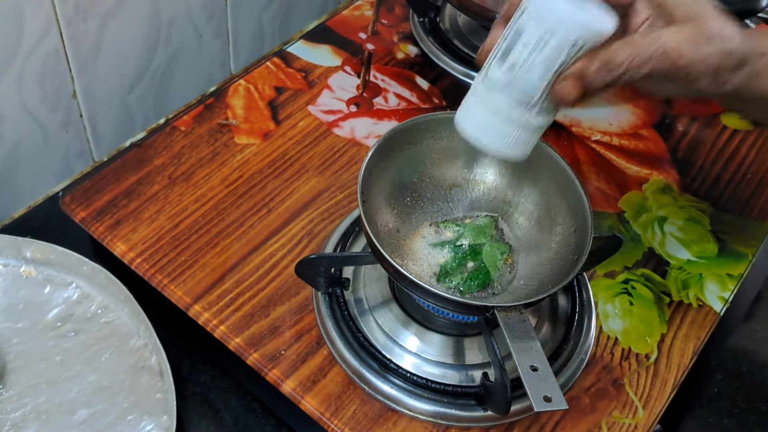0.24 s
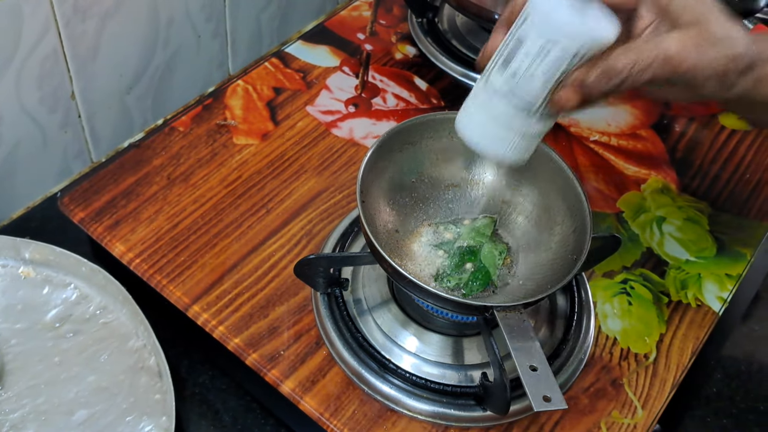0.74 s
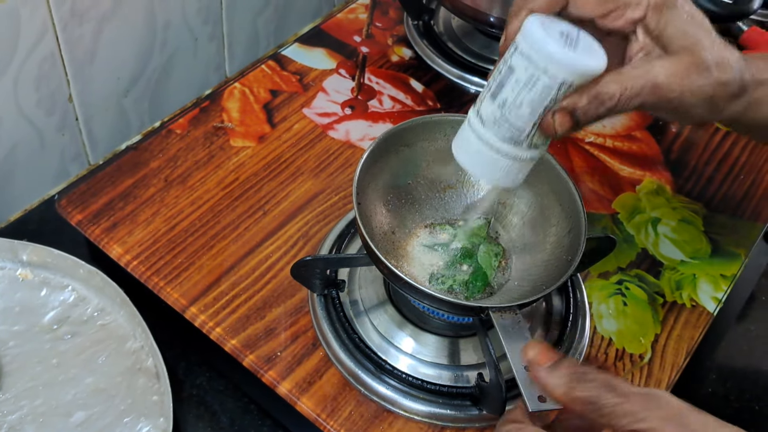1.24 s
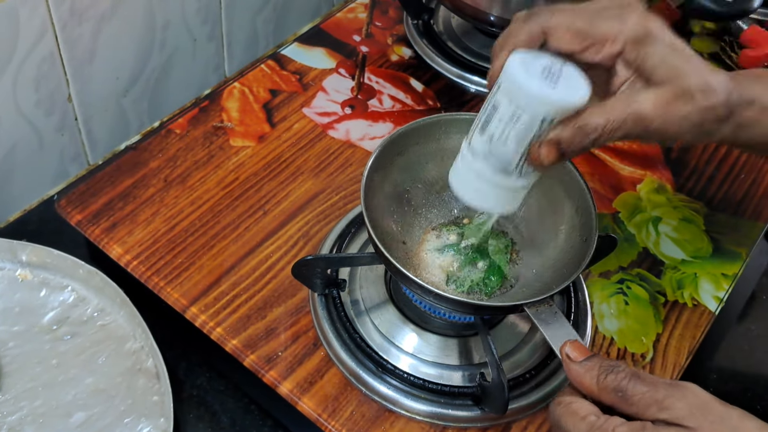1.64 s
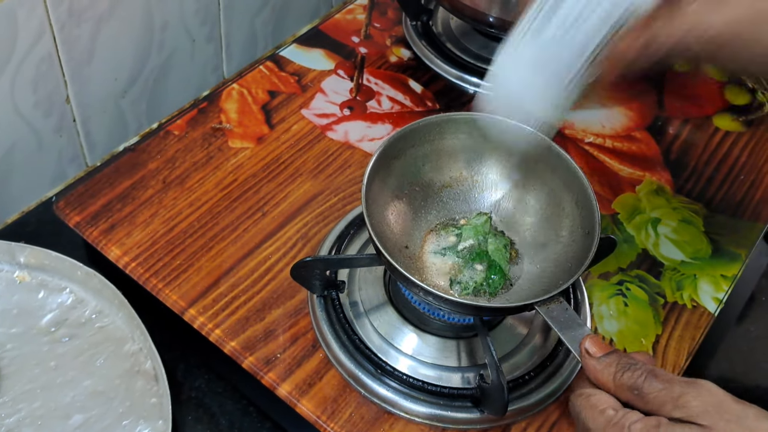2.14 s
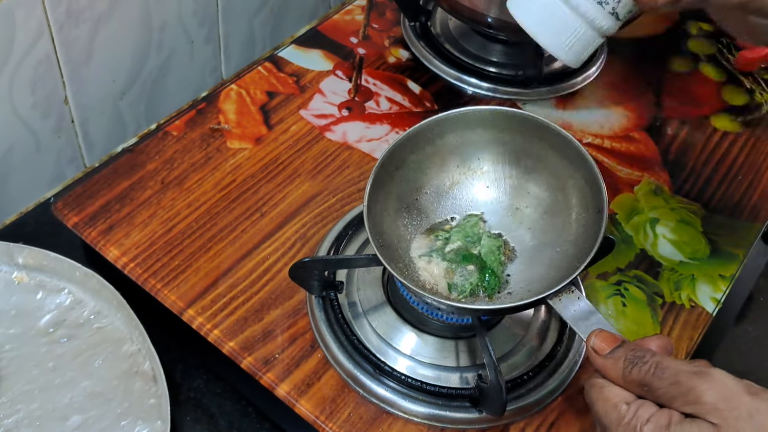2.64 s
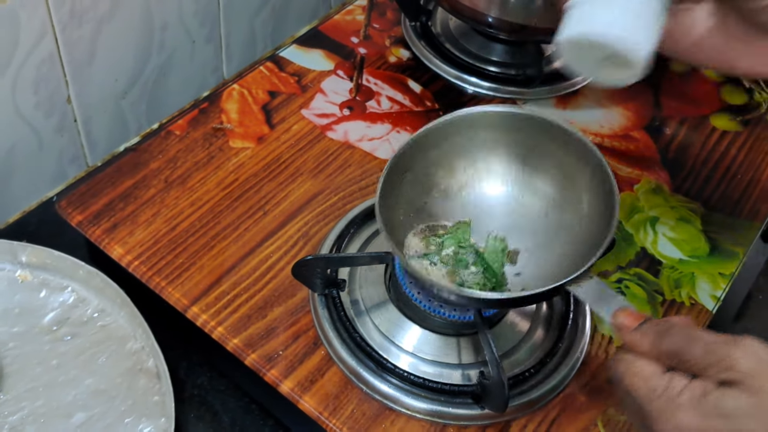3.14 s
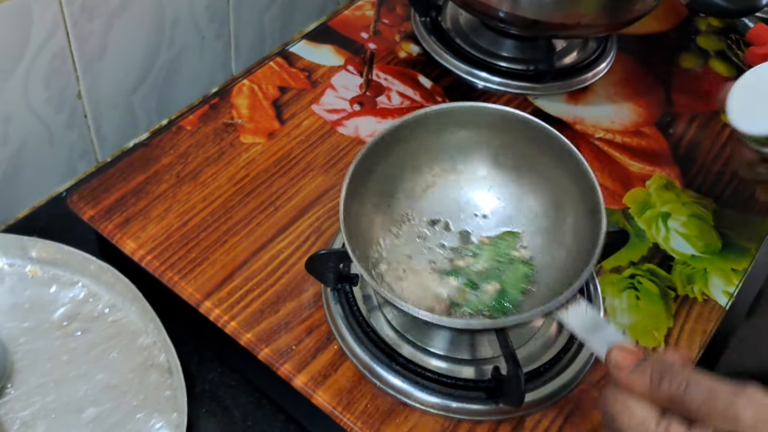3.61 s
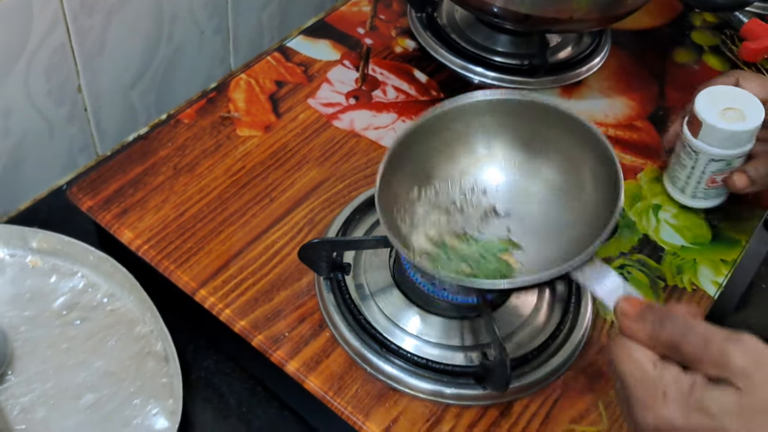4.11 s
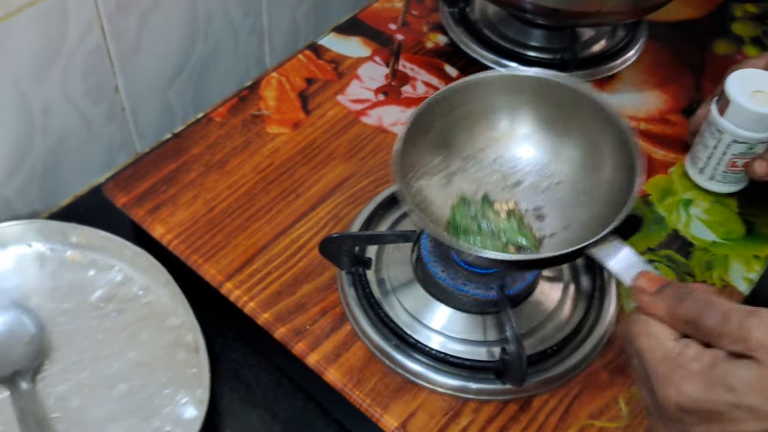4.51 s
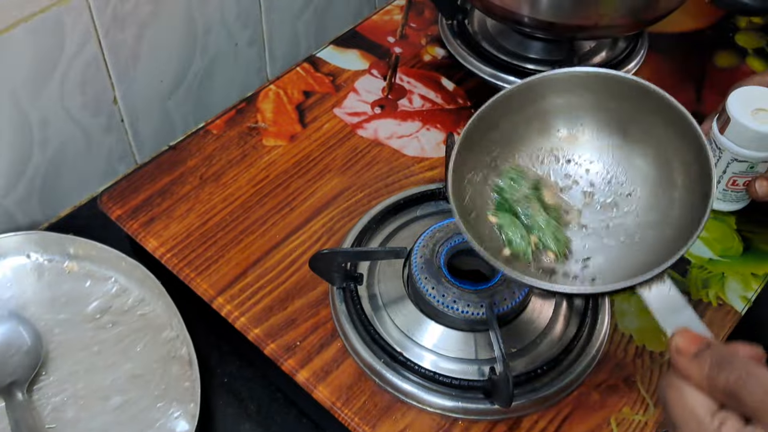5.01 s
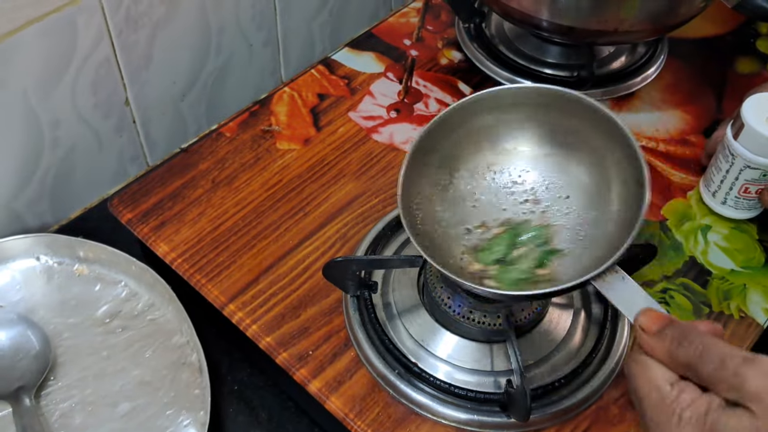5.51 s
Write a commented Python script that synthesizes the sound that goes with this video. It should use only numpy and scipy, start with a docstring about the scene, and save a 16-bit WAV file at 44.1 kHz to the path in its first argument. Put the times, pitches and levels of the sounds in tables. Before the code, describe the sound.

Close up in a small tiled kitchen, hot oil hisses, crackles and spits around frying leaves. The steel pan is nudged repeatedly on its metal support, making brief ringing scrapes. More sharp pops and tiny steam squeaks follow before the pan is set down with a clank near the end. Underneath, a soft gas flame and an engine beyond the wall hum low and slowly grow.

```python
"""Hot oil fizzes, spits and squeaks round seeds and leaves in a small steel pan on a gas stove.
Water drops burst and ring their cavities, fine bubbles click, and steam whistles out of the leaves.
From 1.4 s the pan scrapes on its support by stick-slip friction; it is lifted, swirled and set down.
A slow engine, perhaps a motorcycle in the street, drones through the wall, and the flame rumbles softly.
The tiled kitchen adds a short reverberation to the frying and the scraping."""
import sys
import numpy as np
from scipy import signal
from scipy.fft import rfft, irfft, next_fast_len
from scipy.io import wavfile
from scipy.ndimage import uniform_filter1d, map_coordinates

SR = 44100
rng = np.random.default_rng(int(sys.argv[2]) if len(sys.argv) > 2 else 0)


def inscribe(sig):
    """Save sig as 16-bit PCM at rate SR to the path in sys.argv[1].

    A 1-D sig is mono; a 2-D sig holds one channel per row.
    Samples are clipped to [-1, 1] before scaling.
    """
    pcm = np.round(np.clip(np.atleast_2d(sig).T, -1, 1) * 32767)
    wavfile.write(sys.argv[1], SR, pcm.astype(np.int16))


N = 254104
T = np.arange(N) / SR
LEFT_RIGHT = np.array([[1], [-1]])  # opposite signs in the two channels

# Loudest bursting drops: t/s, level/dB, cavity f/Hz, ring over crack/dB, left over right/dB
DROPS = [(0.047, -37.5, 4940, 19, 6), (0.1712, -28.5, 7540, -9, -2), (0.1715, -31, 2200, 2, 4),
         (0.2374, -32.5, 2410, 2, 3), (0.2608, -20, 4700, -7.5, -1), (0.3182, -24.5, 2780, 3, 1.5),
         (0.3184, -27, 5100, 5, -1), (0.319, -35, 13500, 0, 0), (0.3364, -29, 14000, 11, 4),
         (0.352, -41, 1980, 4, 4), (0.477, -39, 12700, 2, -2), (0.5207, -38.5, 5040, 6, 1),
         (0.6588, -43, 6000, 10, 0), (0.6964, -15.5, 8340, -26, 0.5), (0.9723, -22.5, 13290, -6.5, 1),
         (1.213, -37.5, 2612, 6, 3), (1.2135, -43, 5000, 0, 3), (1.4485, -27, 12600, -2.5, 2),
         (1.5124, -32, 4100, -1.5, -3.5), (1.657, -39, 4200, -20, 1), (1.7, -28.5, 1480, -6.5, 1),
         (1.722, -39, 7400, 0, -3), (1.854, -44, 1730, -3, 1), (1.914, -42, 3000, -23, -3),
         (1.9489, -38.5, 1820, -10, 1), (2.0576, -42, 2580, 0, 0), (2.142, -41.5, 12200, -4, 5),
         (2.4721, -38.5, 6500, 15, 0), (2.56, -43, 3440, 7, 2), (2.693, -37, 2430, -7, 2),
         (2.766, -41.5, 4480, 2, 3), (2.803, -39.5, 10000, 4, -2), (2.8174, -31.5, 13290, -2, 0),
         (2.874, -36, 4000, 3, 0), (2.965, -39.5, 6000, -14, 0), (3.1633, -38.5, 4030, -10, 3),
         (3.3259, -42, 2730, -1, 5), (3.337, -40, 1470, 2, -2), (3.6333, -30.5, 12420, 5, -1),
         (3.6659, -31, 10160, -4, 0), (3.716, -39, 12800, 11, 0), (3.7325, -17, 12900, -8, 0),
         (4.077, -34.5, 12500, 17, -6), (4.1013, -36, 8300, -1, 1), (4.2036, -40.5, 4970, -12, -1),
         (4.343, -41.5, 1430, 12, 0), (4.3654, -29.5, 13400, 3, -10), (4.399, -35, 2030, -11, 1.5),
         (4.4791, -28.5, 3850, -5, 1), (4.4982, -37, 4030, 1, 4), (4.9796, -34.5, 4300, -7, 0),
         (5.348, -30, 8900, 24, -3), (5.3956, -24.5, 7300, 4, -0.5), (5.395, -35, 1600, 13, -4),
         (5.474, -26, 1500, 2, 1), (5.5378, -20, 9970, -8, 1.5), (5.581, -24.5, 2980, -20, 0.5)]
# Delay of the left channel as swirling carries the pan to the right: t/s, lag/ms
LEFT_LAG = [(0, 0.01), (3.6, 0), (4.3, 0.075), (5.76, 0.033)]
# Response of the bowl and the direct path to a crack: f/Hz, level/dB
CRACK_COLOUR = [(100, -18), (500, -10), (1100, 6.5), (2700, 4.5), (3700, 0), (4700, 2), (6500, -1),
                (8200, 3), (14000, -0.5), (16500, -4), (18000, -40)]
# Further colouring of the cracks that the bowl radiates into the room: f/Hz, level/dB
BOWL_RADIATION = [(300, 7), (800, 1.5), (1200, 3), (2000, -1), (3500, 1.5), (4500, 2.5), (6800, -2.5),
                  (8200, 1.5), (10000, -3.5), (12600, 2.5), (15500, -4.5)]
def pops(ring_q=6.0, side_db=-4.0, thud_db=-12.0, mirror_db=-8.5):
    """Impulse excitation: a water drop bursts with a crack and rings its cavity; large drops thud."""
    out = np.zeros((2, N))
    hz = np.fft.rfftfreq(2048, 1 / SR) + 1
    octaves = np.log2(np.clip(hz, 1000, 13000) / 1000)
    direct_path = gain_at(hz, CRACK_COLOUR)
    thud_shape = gain_at(hz, [(25, -20), (55, 4.5), (300, -4.5), (1000, -14.0), (3000, -21.5)])
    largest_db = max(row[1] for row in DROPS)
    tail_room = ((0, 0), (0, SR // 3))
    for s, db, ring_hz, ring_db, left_db in DROPS + spits():
        size_db = db - largest_db
        mid, side = crack(), crack()
        lag_s = np.interp(s, *np.transpose(LEFT_LAG)) / 1000
        left_delay = np.exp(-2j * np.pi * hz * lag_s * np.array([[1], [0]]))
        stereo = (mid + undb(side_db) * side * LEFT_RIGHT) * left_delay
        # smaller cavities crack brighter, fainter drops duller
        db_per_octave = 1.66 * np.log2(ring_hz / 3000) + 0.04 * size_db
        tilted = stereo * direct_path * undb(db_per_octave * octaves)
        mirror_s = rng.uniform(0.000505, 0.00099)  # reflection from the far side of the bowl
        comb = 1 + undb(mirror_db) * np.exp(-2j * np.pi * hz * mirror_s)
        snap = burst(irfft(tilted * comb), 0.82)
        resonance = 1 / (1 + 1j * ring_q * (hz / ring_hz - ring_hz / hz))
        ring = undb(ring_db) * burst(irfft(stereo * resonance), 1.0)
        thud = undb(thud_db + size_db) * burst(irfft(mid * thud_shape), 0.34)
        direct = burst(snap + ring + thud, 0.01)
        room_snap = burst(irfft(tilted * gain_at(hz, BOWL_RADIATION)), 0.61)
        radiated = burst(room_snap + undb(-4) * ring + thud, 0.01)
        # small drops and ringing cavities lie deep in the bowl and excite the room less
        wet_db = 0.72 + 0.084 * size_db - 0.35 * np.clip(ring_db + 11, 0, 15)
        heard = np.pad(direct, tail_room) + undb(wet_db) * reverberation(np.pad(radiated, tail_room))
        start_s = max(s - direct.shape[1] / 2 / SR, 0)
        add(out, start_s, heard * undb(db + left_db * LEFT_RIGHT / 2))
    return out


def crack(snap_s=0.00041, bowl_s=0.0015, bowl_db=-11.5):
    """A short transient is broadband: the flattened spectrum of a snap and its rattle round the bowl."""
    t = T[:2048]
    snap, rattle = rng.standard_normal((2, len(t)))
    pressure = snap * np.exp(-t / snap_s) + undb(bowl_db) * rattle * np.exp(-t / bowl_s)
    spectrum = rfft(np.roll(pressure, len(t) // 2))
    return spectrum / np.sqrt(uniform_filter1d(np.abs(spectrum) ** 2, size=24))


def spits(per_second=3, first_db=-47.5, drying_db_per_s=0.5, low_hz=2260, high_hz=10100):
    """Evaporation: faint drops burst at random and weaken as the leaves dry; rows as in DROPS."""
    when, pitch, *chance = rng.random((int(per_second * T[-1]), 5)).T
    loudness, ring, place = 2 * np.array(chance) - 1
    s = when * T[-1]
    db = first_db - drying_db_per_s * s + 2 * loudness
    ring_hz = low_hz * (high_hz / low_hz) ** pitch
    ring_db = 4 + 10 * np.abs(ring)
    return list(zip(s, db, ring_hz, ring_db, 2 * place))


# Frying, livelier once the oil is swirled over hot steel: t/s, fizz level/dB, crackle level/dB
FRYING = [(0, -44, -45.5), (.55, -47, -51.5), (1.2, -46.5, -52), (1.9, -48.5, -55), (2.15, -47.5, -53.5),
          (2.28, -49.5, -55), (2.38, -46.5, -58.5), (2.95, -47.5, -49), (3.35, -45.5, -53),
          (3.9, -45, -52.5), (4.25, -42.5, -52.5), (4.9, -44, -55.5), (5.25, -49, -57), (5.76, -46.5, -55)]
# Spectrum of the fine bubbles: f/Hz, level/dB
FIZZ = [(2000, -39), (5000, -1.1), (7300, -3), (8200, 7), (9300, 1), (10500, 7), (12700, 12.5), (14000, 8),
        (16000, 7)]
# Spectrum of the larger bubbles: f/Hz, level/dB
CRACKLE = [(600, -32), (1300, 2), (2700, 7.5), (3400, -0.5), (4500, 9.5), (6500, -4), (9000, 7.5)]
def sizzle(right_db=1, ticks_db=-17):
    """Bubble pitch falls with size: fine bubbles fizz and tick, larger ones crackle lower down."""
    fizz_db, crackle_db = curves(FRYING)
    fizz = sum(kitchen(bubbles(per_second=500, spread_db=8), wet_db=14) for _ in range(5))
    ticks = kitchen(bubbles(per_second=96, spread_db=6), wet_db=-18)
    crackle = 0
    for hz in np.geomspace(1100, 9000, num=8):
        clicks = bubbles(per_second=140, spread_db=4)
        crackle += gain_at(hz, CRACKLE) * band(clicks, hz / 1.22, hz * 1.215)
    fizz = colour(unit(fizz) + undb(ticks_db) * unit(ticks), FIZZ)
    fizz = unit(fizz) * undb(fizz_db + walk(19))
    crackle = unit(kitchen(crackle, wet_db=2.5)) * undb(crackle_db + 1.5 * walk(18))
    return (fizz + crackle) * undb(-right_db * LEFT_RIGHT / 2)


def bubbles(per_second, spread_db):
    """Shot noise: independent bubbles click at random instants, most faint and a few strong."""
    out = np.zeros(N)
    at = np.flatnonzero(rng.random(N) < per_second / SR)
    size = rng.exponential(size=N)[at]
    sign = np.sign(rng.random(N)[at] - .5)
    out[at] = sign * undb(spread_db * np.minimum(size, 5))
    return unit(out)


# Steam escaping from a leaf: t/s, relative level/dB, f/Hz, duration/s, bandwidth/Hz
STEAM_JETS = [(3.255, -42.5, 10800, 0.0063, 3500), (3.832, -52, 12800, .018, 200),
              (3.912, -41, 6990, .0044, 3000), (4.17, -32.5, 12700, 0.0075, 330),
              (4.766, -38, 12800, .009, 420), (5.129, -38, 13600, .006, 900), (5.13, -38, 12210, .006, 550),
              (5.446, -42, 12600, .0068, 800)]
def squeaks(gain_db=1.0):
    """Jet noise: steam forced through a tiny hole whistles in a narrow band; a wider tear hisses."""
    out, t = np.zeros(N), T[:4096]
    for s, db, hz, length_s, width_hz in STEAM_JETS:
        tone = band(rng.standard_normal(len(t)), hz - width_hz / 2, hz + width_hz / 2)
        envelope = t * np.exp(-(t / length_s) ** 2)
        add(out, s, undb(db + gain_db) * burst(tone * envelope, length_s))
    return kitchen(out, wet_db=0.5)


# Shoves of the pan: t/s, level/dB, swell time/s, tilt/(dB per octave), pan note over stove modes/dB
SHOVES = [(1.430, -29, 0.018, -0.5, 6), (1.499, -33.5, 0.015, -3.5, 13), (1.645, -29.5, 0.015, 3, 7.5),
          (1.722, -22.5, 0.0095, 0.5, 13), (2.186, -26.5, .012, 0, 1), (2.289, -45, 0.031, 1, 6),
          (2.354, -30, .016, 3.5, 4.5), (2.43, -36.5, 0.028, -1.5, 6), (2.561, -35, 0.0091, -2, 2),
          (2.615, -38.5, 0.0084, -6, -8), (2.661, -42, 0.01, 2, -1), (2.735, -25, 0.0085, 0.5, 11),
          (2.795, -27, 0.0072, -6, -2), (2.848, -37, 0.008, -8, 2), (2.923, -28.5, 0.011, -1.5, -5),
          (3.003, -35, 0.027, -4.5, -8), (3.090, -29.5, 0.016, -1.5, 2), (3.149, -36.5, .009, 2, -8),
          (3.195, -29.5, 0.013, 1, 2), (3.243, -37, 0.011, -2.5, 8), (3.31, -41.5, 0.012, -6, -3),
          (5.355, -38, 0.016, 1, 13), (5.421, -37.5, 0.032, -1, 4)]
# Spectrum of steel rasping on the support: f/Hz, level/dB
RASP = [(50, -45), (200, -24), (290, 15), (430, 16), (520, 11), (650, 17), (760, 15), (880, 16.5),
        (1150, 6.5), (1480, 10), (1800, 1), (2200, 1), (3500, -10.5), (7000, -26), (15000, -30)]
# The pan landing on its support: t/s, level/dB, swell time/s
SET_DOWN = (5.587, -24, 0.0094)
# Spectrum of that impact: f/Hz, level/dB
CLANK = [(50, -37), (220, -24), (330, 6), (430, 5), (540, -5), (720, -1), (900, 2), (1100, -3), (1500, -12),
         (1850, -13.5), (2600, -8.5), (4500, -27), (8000, -42), (15000, -27)]
PIVOT_HZ = 500  # a shove's spectrum tilts about this frequency
def pan_scrapes(left_db=2.0):
    """Friction and impact: the shoved pan rasps and rings the stove, then lands with a clank."""
    rings, rasps = np.zeros(N), np.zeros(N)
    for s, db, swell_s, tilt, note_db in SHOVES:
        force = stick_slip(swell_s)
        rasp = colour(force, [(hz, level + tilt * np.log2(hz / PIVOT_HZ)) for hz, level in RASP])
        rasp_db = -7 + 2 * np.log2(swell_s / 0.02)  # a slow shove rasps more than a quick one
        add(rings, s, undb(db) * burst(stove_ring(force, tilt, note_db), 0.013))
        add(rasps, s, undb(db + rasp_db) * burst(rasp, 0.016))
    s, db, swell_s = SET_DOWN
    clank = colour(stick_slip(swell_s), CLANK)
    add(rasps, s, undb(db) * burst(clank, 0.015))
    heard = kitchen(band(rings, 266, 6100), wet_db=-12) + kitchen(rasps, wet_db=-2)
    return heard * undb(left_db * LEFT_RIGHT / 2)


def stick_slip(swell_s, grit=1.2):
    """Stick-slip friction: uneven slips of steel on steel give a force that swells and dies away."""
    t = T[:SR // 2]
    noise = rng.standard_normal(len(t))
    return np.sign(noise) * np.abs(noise) ** grit * t * np.exp(-t / swell_s)


# Modes of the support and stove top together: f/Hz, level/dB, T60/s
STOVE_MODES = [(282.7, 2.5, 0.46), (345.4, 4, 0.2), (369.3, 0, 0.26), (419.6, 0, 0.17), (431.3, 2.5, 0.24),
               (473, -15, 0.34), (579, -5.5, 0.46), (630, -3, 0.41), (723, -4.5, 0.091), (826, -13, 0.11),
               (909, -10.5, 0.14), (1077, -23, .2), (1475, -16, 0.1), (2110, -20, 0.13)]
def stove_ring(force, tilt, note_db, detune_spread=.004, scatter_db=2, bend=0.0034):
    """Modal superposition: a moving contact bends and reweights stove modes; the pan's note holds."""
    def mode(hz, t60_s):
        pole = np.exp((2j * np.pi * hz - np.log(1000) / t60_s) / SR)
        return burst(signal.lfilter([1], [1, -pole], force).imag, 1)
    ring = 0
    for hz, db, t60_s in STOVE_MODES:
        detune, weight = rng.standard_normal(2)
        gain = undb(db + tilt * np.log2(hz / PIVOT_HZ) + scatter_db * weight)
        ring += gain * mode(hz * (1 + detune_spread * detune), t60_s)
    pitch_ratio = 1 + bend * walk(42)[:len(ring)]
    bent = map_coordinates(ring, [np.cumsum(pitch_ratio)], order=1)
    return bent + undb(note_db) * mode(hz=662.6, t60_s=0.23)


# Soft bump of the swirled pan: t/s, level/dB, f/Hz, swell time/s
BUMP = (4.185, -41, 262, .013)
def pan_bump():
    """Damped oscillation: one low note swells and dies as the pan is swung."""
    s, db, hz, swell_s = BUMP
    out, t = np.zeros(N), T[:SR // 4]
    note = np.sin(2 * np.pi * hz * t) * t * np.exp(-t / swell_s)
    add(out, s, undb(db) * burst(note, 0.026))
    return out


# Firing rate of the engine: t/s, f/Hz
FIRING_RATE = [(0, 28.95), (.6, 28.49), (1.35, 28.1), (1.65, 32.22), (1.97, 33.93), (2.55, 24.55),
               (3.3, 23.55), (4.0, 25.1), (4.65, 26.08), (4.9, 27.66), (5.4, 27.4), (5.76, 29)]
# Engine load, heard as the strength of the drone: t/s, relative level/dB
ENGINE_LOAD = [(0, -50), (.65, -41.5), (1.05, -48.5), (1.28, -45), (1.6, -56), (1.72, -45), (1.95, -49),
               (2.25, -41.5), (2.45, -49), (2.72, -59), (2.92, -44), (3.05, -48), (3.34, -41),
               (3.85, -40.5), (4.25, -39), (4.38, -47), (4.62, -38), (5.0, -35.5), (5.47, -38),
               (5.56, -49.5), (5.72, -33)]
# Transmission of the drone through the wall: f/Hz, level/dB
WALL_DRONE = [(70, -57), (88, -3.5), (100, 3.5), (122, 1), (143, 10), (154, -3.5), (167, 2), (190, -5.5),
              (222, -8), (260, -34)]
# Strength of the deep thud: t/s, relative level/dB
THUD_LEVEL = [(0, -77), (1.1, -58), (2.0, -58.5), (3.9, -54), (4.3, -44.5), (5.0, -41.5), (5.48, -43),
              (5.58, -56), (5.76, -51)]
# Transmission of the thud through the wall: f/Hz, level/dB
WALL_THUD = [(46, -38), (54, 1), (59, 0.5), (68, 11.5), (71, 5), (76, -2.5), (84, -20), (110, -30)]
# One boom of the slowing engine: t/s, level over the thud/dB, half duration/s
BOOM = (2.56, 21.3, 0.072)
def engine(drone_db=-3.5, waver_db=1.66, swell_db=1.5, idle_db=-43):
    """Wall transmission: only low harmonics of the firing rate pass, as a wavering drone and a thud."""
    hz, = curves(FIRING_RATE)
    load_db, = curves(ENGINE_LOAD)
    thud_db, = curves(THUD_LEVEL)
    boom_s, boom_db, half_length_s = BOOM
    thud_db += boom_db * np.exp(-((T - boom_s) / half_length_s) ** 2)
    phase = 2 * np.pi * np.cumsum(hz * (1 + 0.0037 * walk(14))) / SR
    orders = np.arange(2, 10)[:, None]
    harmonics = np.array([np.sin(k * phase + 2 * np.pi * rng.random()) for k in orders])
    flutter = undb([waver_db * walk(15) + swell_db * walk(5) for _ in orders])
    db_per_octave = 0.14 * (load_db - idle_db)  # load strengthens the upper harmonics
    drone = gain_at(orders * hz, WALL_DRONE) * undb(db_per_octave * np.log2(orders))
    drone /= np.sqrt(np.sum(drone ** 2, axis=0) / 2)  # equal power at any firing rate
    drone = flutter * drone * undb(load_db + drone_db)
    thud = gain_at(orders * hz, WALL_THUD) * undb(thud_db)
    return np.sum(harmonics * (drone + thud), axis=0)


# Spectrum of the flame's rumble: f/Hz, level/dB
RUMBLE = [(25, -47), (38, -9), (52, 0.5), (80, -1), (115, -1), (146, 8), (180, -9.5), (250, -0.5),
          (370, -4), (470, -8), (680, -12), (900, -14.5), (2000, -22.5), (5000, -30)]
# The flame, rushing freely once the pan is lifted: t/s, level/dB, relative level of the rush/dB
FLAME_LEVEL = [(0, -52, -6), (1.2, -54, -3), (3, -47.5, -4), (4.1, -48.5, 3.5), (5.76, -42.5, 2.5)]
# Resonances of the bowl in the gas flow: f/Hz, bandwidth/Hz, level/dB
BOWL_MODES = [(588, 200, -2), (1160, 136, -4.5), (1480, 125, -8.5), (2790, 340, -12.5)]
def flame(flutter_db=1.0, bowl_db=-11):
    """Combustion noise: the flame rumbles and flutters, and rushing gas excites the bowl's modes."""
    db, rush_db = curves(FLAME_LEVEL)
    mid, side = (unit(colour(rng.standard_normal(N), RUMBLE)) for _ in range(2))
    side = colour(side, [(60, -4.0), (150, -7.5), (400, -8.0), (1000, 1.5)])  # narrower in the bass
    rush = 0
    for hz, width_hz, mode_db in BOWL_MODES:
        flow = rng.standard_normal((2, N))
        rush += undb(mode_db) * unit(band(flow, hz - width_hz / 2, hz + width_hz / 2))
    heard = mid + side * LEFT_RIGHT + unit(rush) * undb(bowl_db + rush_db)
    return heard * undb(db + flutter_db * walk(7.5))


def reverberation(x, t60_s=0.35, treble_t60_s=0.3):
    """Diffuse field: each spot has its own echo off the tiles, alike left and right only in the bass."""
    t = T[:SR // 3]
    mid, side = rng.standard_normal((2, len(t)))
    noise = mid + band(side, 390, 24000) * LEFT_RIGHT
    low = signal.sosfilt(signal.butter(1, 4000, fs=SR, output="sos"), noise)
    tail = low * undb(-60 * t / t60_s) + (noise - low) * undb(-60 * t / treble_t60_s)
    tail *= 1 - np.exp(-t / 0.0021)
    tail /= np.sqrt(np.sum(tail ** 2) / 2)
    tail[:, int(.0118 * SR)] += .2  # early reflection from the nearest wall
    return signal.oaconvolve(np.atleast_2d(x), tail, axes=1)[:, :x.shape[-1]]


def kitchen(x, wet_db):
    """Room sound is the sum of the direct and reverberant fields."""
    return x + undb(wet_db) * reverberation(x)


def undb(db):
    """Amplitude ratio of a level in decibels."""
    return 10 ** (np.asarray(db) / 20)


def unit(x):
    """Power normalisation to rms 1."""
    return x / np.sqrt(np.mean(x ** 2))


def burst(x, seconds):
    """Energy normalisation to that of rms 1 held for the given time."""
    return x * np.sqrt(seconds * SR / np.sum(x ** 2))


def curves(table):
    """Linear interpolation of each column of a time table, sample by sample."""
    s, *columns = np.transpose(table)
    return [np.interp(T, s, column) for column in columns]


def gain_at(hz, points):
    """Frequency response interpolated from rows of f/Hz, level/dB."""
    f, db = np.transpose(points)
    return undb(np.interp(np.log(hz + 1), np.log(f), db))


def colour(x, points):
    """Zero-phase filtering by rows of f/Hz, level/dB."""
    n = x.shape[-1]
    size = 2 * next_fast_len(n)
    return irfft(rfft(x, size) * gain_at(np.fft.rfftfreq(size, 1 / SR), points))[..., :n]


def band(x, lo_hz, hi_hz):
    """Causal band-pass filtering."""
    sos = signal.butter(2, [lo_hz, min(hi_hz, SR / 2 - 1)], "band", fs=SR, output="sos")
    return signal.sosfilt(sos, x)


def walk(rate_hz):
    """Random modulation: smoothed steps with a spread near 1."""
    hold = int(SR / rate_hz)
    steps = np.repeat(rng.standard_normal(N // hold + 1), hold)
    return 1.67 * uniform_filter1d(uniform_filter1d(steps, hold), hold)[:N]


def add(out, s, x):
    """Superposition of a short sound starting at time s."""
    i = int(s * SR)
    out[..., i:i + x.shape[-1]] += x[..., :N - i]


def scene():
    """Linear superposition of oil, pan, engine and flame."""
    return pops() + sizzle() + squeaks() + pan_scrapes() + pan_bump() + engine() + flame()


def record(dry, top_hz=15850):
    """Saturation and band limiting: clipping at full scale, then a steep low-pass."""
    low_pass = signal.ellip(10, .2, 70, top_hz, fs=SR, output="sos")
    return signal.sosfilt(low_pass, np.clip(dry, -1, 1))


dry = scene()
out = record(dry)
inscribe(out)
```